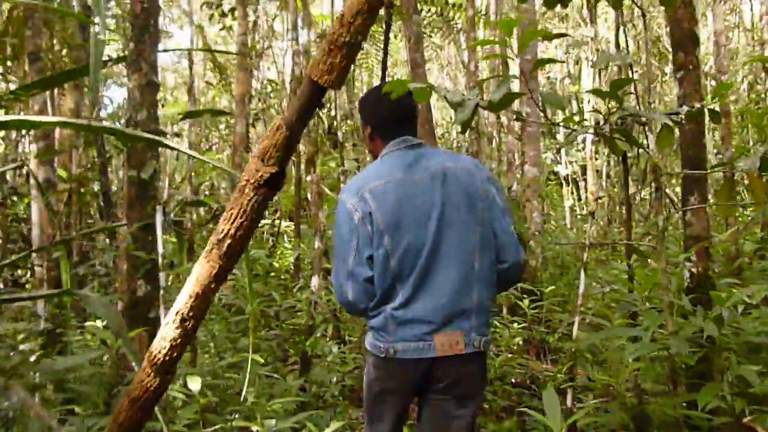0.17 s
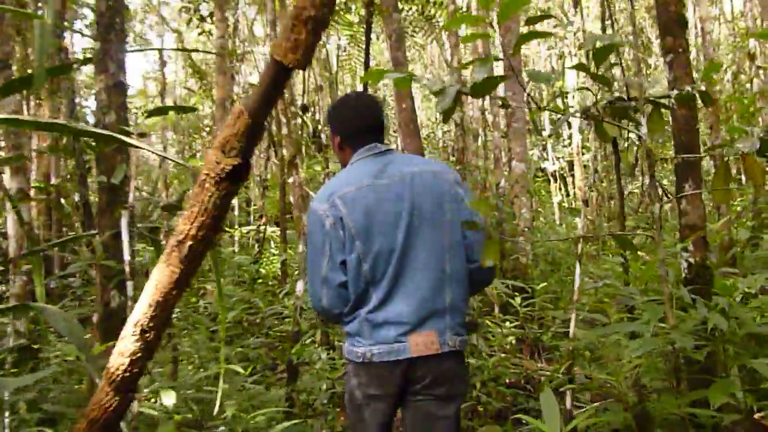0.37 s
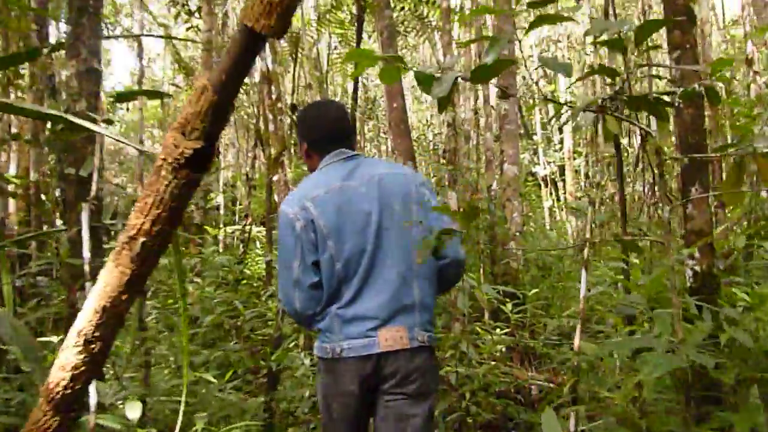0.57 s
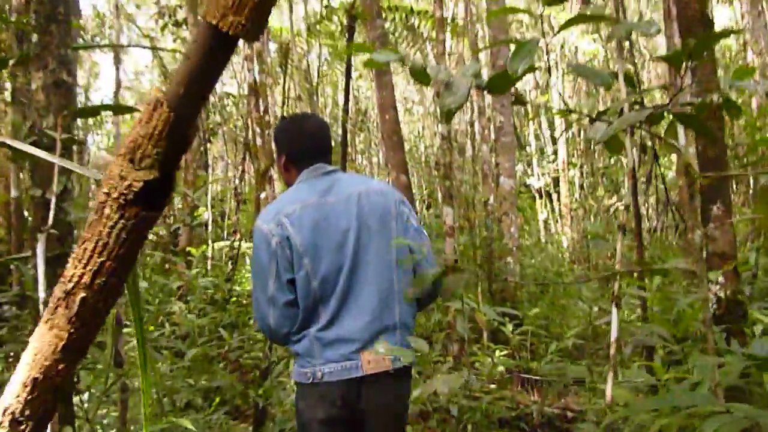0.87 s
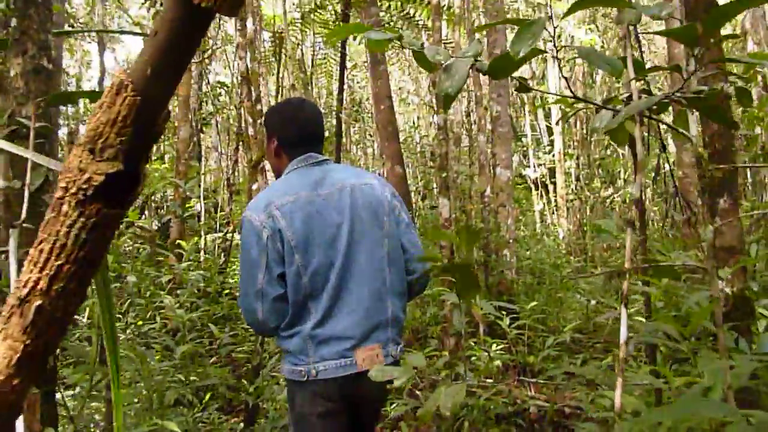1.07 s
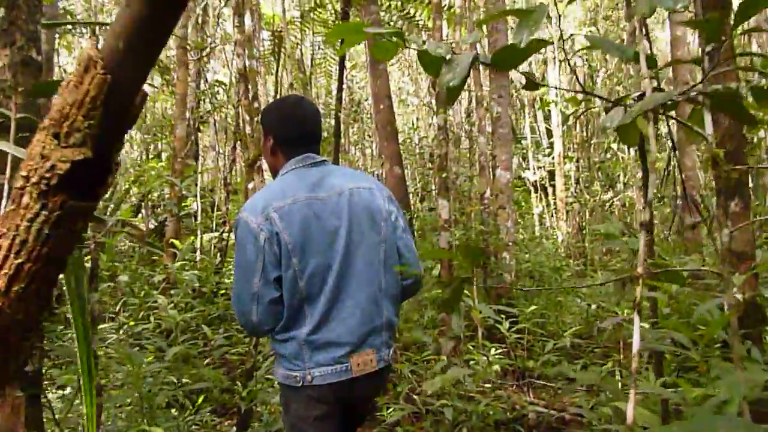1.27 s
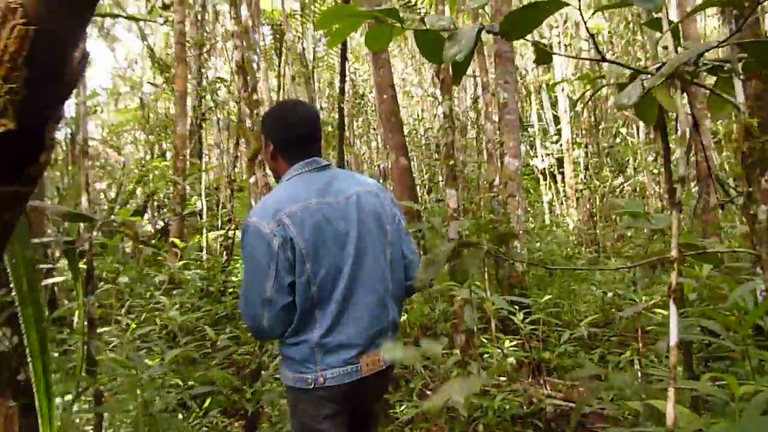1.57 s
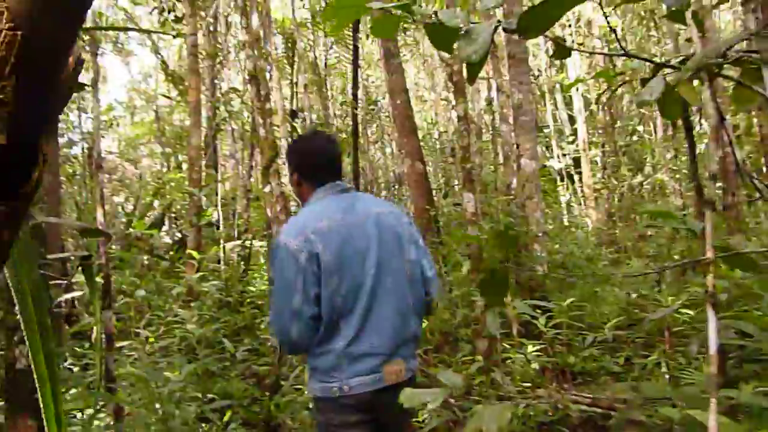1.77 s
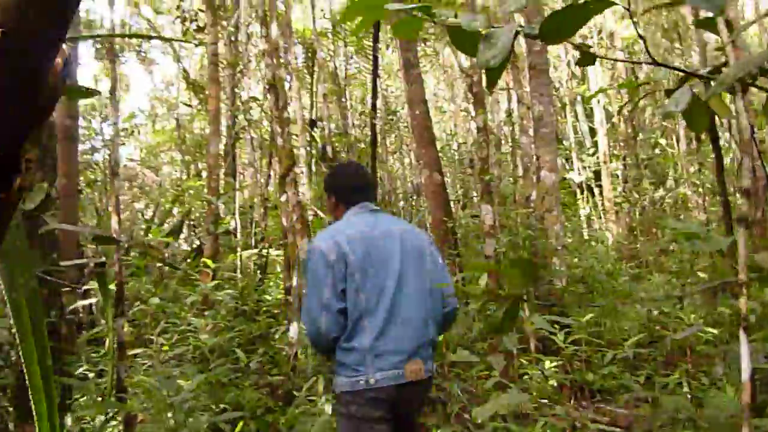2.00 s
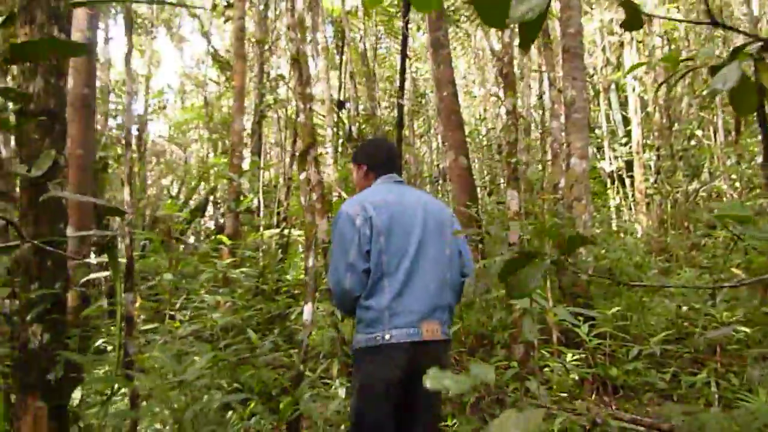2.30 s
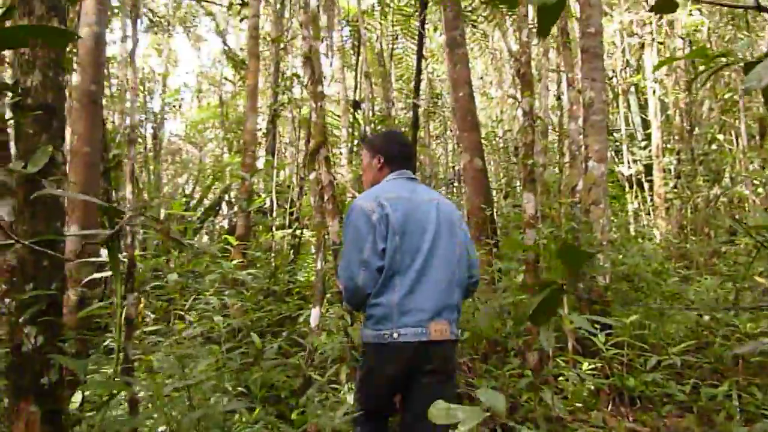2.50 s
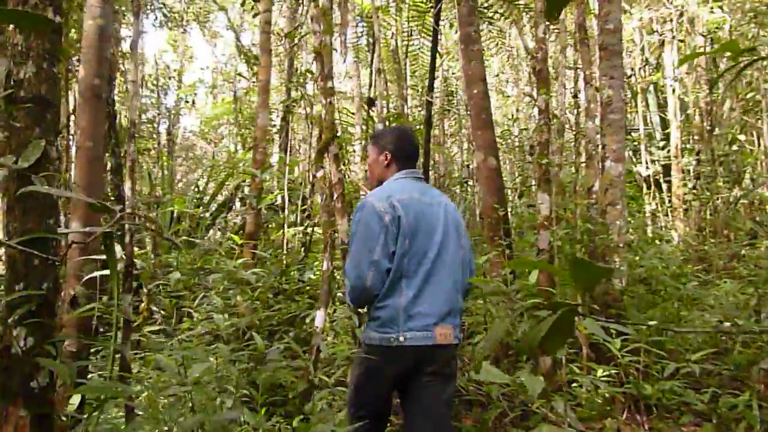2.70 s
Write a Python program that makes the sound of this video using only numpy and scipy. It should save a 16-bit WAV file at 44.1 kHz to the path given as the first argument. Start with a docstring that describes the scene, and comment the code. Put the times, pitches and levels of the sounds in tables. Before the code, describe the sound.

A lemur honks six times in a forest, about every 0.4 seconds from 0.3 to 2.5 seconds, each echoing honk on the same pitch and led by a quieter, hoarse grunt. The first four crack into a rasp; the last two are cleaner. Leaves rustle softly underfoot during the first second, with one tiny high squeak near 0.3 seconds. A faint forest hiss continues throughout.

```python
"""In a rainforest, a lemur honks six times, with a low, hoarse grunt before each honk.
A honk is a stack of harmonics: tones at whole multiples of one pitch. The first four crack into
a rasp and a second, higher voice; the last two stay clean. Tree trunks throw back a long echo.
Leaves rustle underfoot over a faint forest hiss, and there is one short, high squeak."""
import sys
import numpy as np
from scipy import signal
from scipy.fft import rfft, irfft, next_fast_len
from scipy.io import wavfile

SR = 44100
rng = np.random.default_rng(int(sys.argv[2]) if len(sys.argv) > 2 else 0)


def master(y):
    """Save y as 16-bit WAV."""
    cut = np.clip(np.atleast_2d(y).T, -1, 1)
    pcm = np.round(cut * 32767)  # scale
    wavfile.write(sys.argv[1], SR, pcm.astype(np.int16))


N = 125685
TIME = np.arange(N) / SR

# tone colour of the forest hiss: frequency_hz, relative_db
HISS_COLOUR = [(15, -47.5), (25, -29), (50, -11), (120, -2.5), (250, 0.5), (600, -2.5), (1200, -7.5),
               (2500, -16), (4500, -10.5), (6500, -17.5), (9000, -41)]
# steps in the leaves: middle_s, half_length_s, level_db
FOOTSTEPS = [(0.028, .08, -41), (0.238, .09, -44), (0.901, .05, -43.5), (2.71, .03, -95.5)]
# tone colour of the leaves: frequency_hz, relative_db
LEAF_COLOUR = [(100, -17.5), (300, 1.5), (1100, 4), (2600, -5), (4200, -5.5), (6200, -2), (7500, -8),
               (9000, -20)]
# grunts: start_s, length_s, pitch_hz, glide_hz_per_s, level_db, noise_share, tilt_db_per_octave
GRUNT_CALLS = [(0.141, 0.16, 229.3, -280, -31.5, 0.22, 3.5), (0.493, 0.18, 188.1, -38, -35.5, 0.31, 2.5),
               (0.876, .20, 190.9, -18, -34.5, 0.3, 3), (1.261, 0.24, 186.7, 26.5, -36, 0.25, 3.5),
               (1.656, 0.22, 181, -2.5, -41, 0.85, 2), (2.143, 0.15, 198.5, 17.5, -39, .92, 3.5)]
# how the throat colours a grunt: frequency_hz, relative_db
THROAT_COLOUR = [(100, -19.5), (150, -16), (190, 10), (280, 8.5), (450, -3.5), (560, -2.5), (700, 11),
                 (900, -4.5), (1200, 1.5), (1500, -7.5), (2100, -16.5), (3000, -36), (8000, -46.5)]
# single echoes from big trunks: delay_s, level_db
TRUNK_SLAPS = [(.034, -17.5), (.072, -15), (.2, -32)]
# the long echo: frequency_hz, time_to_fade_60_db_s, level_db
ECHO_BANDS = [(150, .45, -16.5), (670, 0.83, -5.5), (1410, 0.86, -6), (2130, 0.96, -3), (3450, 0.73, 0),
              (6500, 0.91, 1)]
# the squeak: middle_s, half_length_s, pitch_hz, width_hz
HIGH_SQUEAK = (.326, .007, 6550, 150)
# honks: start_s, length_s, pitch_hz, level_db, second_harmonic_db, third_harmonic_db, treble_db,
# hoarseness_db, lowest_harmonic_fade_db_per_s, overtone_swell_db_per_s
HONK_CALLS = [(.333, 0.1, 678.2, -11.5, -5, -6, -5.5, -38, 114.5, 3),
              (.662, 0.17, 656.3, -14, -3.5, -4.5, -5.5, -29.5, 40, 12.5),
              (1.064, 0.16, 660.6, -17, -2, -1.5, 0.5, -13.5, 3, 9),
              (1.474, 0.14, 660.7, -19.5, 2, -1.5, 2, -16, 40, -6.5),
              (1.890, 0.1494, 667.1, -16, -8, -2.5, -3.5, -22.5, 55, 31.5),
              (2.310, 0.16, 664.2, -16, 0, -4.5, -6, -35, 42, 23.5)]
# tone colour of the rasp that opens a honk: frequency_hz, relative_db
OPENING_RASP_COLOUR = [(200, -26), (450, -9.5), (620, 1), (900, -6), (1250, -5), (1700, -12.5), (2100, -14),
                       (2700, -36.5), (6000, -34.5)]
# tone colour of the rasp in hoarse or cracking honks: frequency_hz, relative_db
RASP_COLOUR = [(200, -44), (450, -19), (650, 3.5), (850, 0), (1250, 10), (1700, -4), (2100, 6),
               (2600, -25.5), (3500, -21.5), (4700, -14), (6500, -22), (9000, -45)]
# how the voice colours a honk's harmonics: frequency_hz, gain_db
VOICE_COLOUR = [(660, -2), (2050, -8), (2700, -25), (3400, -25), (4000, -30), (4700, -25.5), (6000, -29),
                (6700, -28.5), (7400, -36), (8800, -46)]
# strong-weak pulses add a tone half a step down the stack: harmonic_hz, relative_to_harmonic_db
BETWEEN_TONES = [(330, -39.5), (1650, -35), (3000, -12), (4300, -16.5), (6300, -10.5), (8000, -5)]
# where the higher voice breaks in:
# middle_s, half_length_s, pitch_hz, rasp_db, higher_voice_db, lower_voice_left_db, jitter_share
VOICE_CRACKS = [(.346, 0.0088, 692.6, -17, -2, -8, 0.0024), (.729, 0.0081, 693.8, -22, -2, -7, 0.008),
                (1.112, 0.0043, 688.4, -24.5, -2.5, -7.5, 0.0065),
                (1.521, 0.01, 695.5, -21.5, -1, 1, 0.0094)]
# the microphone's tone colour: frequency_hz, gain_db
MICROPHONE_COLOUR = [(20, 0), (2700, 0), (2880, -10), (3000, -28), (3120, -10), (3300, 0), (4950, 0),
                     (5120, -9), (5205, -28), (5300, -5), (5600, 0), (7350, 0), (7700, -10), (8000, -38),
                     (8300, -14), (8750, -10), (9000, -22)]


def amp(db):
    """Turns decibels into a number to multiply by."""
    return 10 ** (np.asarray(db) / 20)


def unit(x):
    """Scales a signal to an average strength (rms) of 1."""
    return x / np.sqrt(np.mean(x ** 2) + 1e-20)


def read(points, hz, column=1):
    """Reads between a table's rows, with octaves evenly spaced."""
    table = np.transpose(points)
    return np.interp(np.log(hz + 1), np.log(table[0]), table[column])


def colour(x, points):
    """Turns each frequency up or down as a table says."""
    size = next_fast_len(2 * len(x))
    return irfft(rfft(x, size) * amp(read(points, np.fft.rfftfreq(size, 1 / SR))), size)[:len(x)]


def noise(points):
    """Noise of strength 1 with the given tone colour."""
    return unit(colour(rng.standard_normal(N), points))


def wander(hz):
    """A random wobble of strength 1, up to about the given rate."""
    keep_slow = np.exp(-(np.fft.rfftfreq(N, 1 / SR) / hz) ** 2)
    return unit(irfft(rfft(rng.standard_normal(N)) * keep_slow, N))


def bump(at, half):
    """A bell-shaped rise and fall in time."""
    return np.exp(-.5 * ((TIME - at) / half) ** 2)


def gate(t, length, rise_s, fall_s):
    """Fades in, holds and fades out."""
    return np.sin(np.pi / 2 * np.clip(t / rise_s, 0, 1) * np.clip((length - t) / fall_s + .5, 0, 1)) ** 2


def forest_hiss():
    """A faint hiss whose level wavers a little."""
    return amp(-52.5) * noise(HISS_COLOUR) * amp(1.5 * wander(hz=5))


def leaf_steps():
    """Leaves crackle underfoot in short bursts of flickering noise."""
    crackle = unit(noise(LEAF_COLOUR) * amp(1.86 * wander(hz=150)))
    return crackle * sum(amp(db) * bump(at, half) for at, half, db in FOOTSTEPS)


def grunts(rise_s=.038, fall_s=.069, jitter=.015, between_db=-5):
    """Low pulses, strong and weak in turn, pass with hoarse noise through the lemur's throat."""
    out, shake = np.zeros(N), wander(hz=50)
    for start, length, pitch, glide, db, noise_share, tilt_db in GRUNT_CALLS:
        on = (TIME >= start) & (TIME < start + length + fall_s)
        t = TIME[on] - start
        hoarse = noise([(hz, level + tilt_db * np.log2(hz / pitch)) for hz, level in THROAT_COLOUR])
        phase = 2 * np.pi * np.cumsum((pitch + glide * t) * (1 + jitter * shake[on])) / SR
        pulses = 0
        for k in range(2, 20):  # even k: harmonics; odd k: the tones between them
            tone_db = read(THROAT_COLOUR, k * pitch / 2) + between_db * (k % 2) + tilt_db * np.log2(k)
            pulses += amp(tone_db) * np.cos(k * phase / 2 + rng.uniform(0, 2 * np.pi))
        grunt = np.sqrt(1 - noise_share) * unit(pulses) + np.sqrt(noise_share) * hoarse[on]
        out[on] += amp(db) * gate(t, length, rise_s, fall_s) * grunt
    return out


def trunk_echo(calls, echoes_per_s=2500, build_s=.005, hold_s=.12):
    """Trunks throw the calls back: three single slaps, and many small echoes that blur and die away."""
    size = 2 * SR
    scatter = rng.standard_normal(size) * (rng.random(size) < echoes_per_s / SR)
    hz, t, bands = signal.stft(unit(scatter), SR, nperseg=256)
    fade = amp(-60 * np.maximum(t - hold_s, 0) / read(ECHO_BANDS, hz)[:, None])
    shape = fade * (1 - np.exp(-t / build_s))
    shape /= np.sqrt(np.mean(shape ** 2, axis=1, keepdims=True) * size)  # same energy in each band
    band_gain = amp(read(ECHO_BANDS, hz, column=2))[:, None]
    tail = signal.istft(bands * shape * band_gain, SR, nperseg=256)[1]
    slaps = sum(amp(db) * np.interp(TIME - delay, TIME, calls, left=0) for delay, db in TRUNK_SLAPS)
    return calls + slaps + signal.fftconvolve(calls, tail)[:N]


def squeak():
    """One very short, high, fluttering tone."""
    at, half, hz, width = HIGH_SQUEAK
    return amp(-35.5) * bump(at, half) * unit(wander(width) * np.sin(2 * np.pi * hz * TIME))


def honk_voice(t, length, hz, harmonic_db, fade_db, swell_db, open_s=.003, close_s=.012):
    """A stack of harmonics: high ones open and close more slowly, and the lowest fades as it sounds."""
    phase, out = 2 * np.pi * np.cumsum(hz) / SR, 0
    for k, db in enumerate(harmonic_db, 1):
        harmonic_hz = k * np.median(hz)
        opening = (1 - np.exp(-t / (open_s * k))) ** 2
        closing = .5 + .5 * np.tanh((length - t) / (close_s * k) + 1)
        harmonic = np.cos(k * phase + rng.uniform(0, 2 * np.pi))
        between = amp(read(BETWEEN_TONES, harmonic_hz)) * np.cos((k - .5) * phase)
        level_db = read(VOICE_COLOUR, harmonic_hz) + db + t * (-fade_db if k == 1 else swell_db)
        out += opening * closing * amp(level_db) * (harmonic + between)
    return np.sqrt(2) * out


def honks(rise_s=.022, fall_s=.085, jitter=.0021, sag_hz_per_s=20.8, high_sag_hz_per_s=110):
    """Each honk slides up out of a rasp to a held pitch; a crack lets in a shakier, higher voice."""
    out, rasp, opening_rasp = np.zeros(N), noise(RASP_COLOUR), noise(OPENING_RASP_COLOUR)
    shake = wander(hz=130)
    for i, honk in enumerate(HONK_CALLS):
        start, length, pitch, db, second_db, third_db, treble_db, hoarse_db, fade_db, swell_db = honk
        on = (TIME >= start) & (TIME < start + length + fall_s)
        t = TIME[on] - start
        scoop = .25 * np.exp(-t / .007)  # the pitch starts 25% low
        end_drop = .006 * np.exp(np.minimum((t - length) / .015, 1))
        bend = 1 - scoop - end_drop
        hz = (pitch - sag_hz_per_s * t) * (bend + jitter * shake[on])
        harmonic_db = [0, second_db, third_db] + [treble_db] * 10
        tone = honk_voice(t, length, hz, harmonic_db, fade_db, swell_db)
        if i < len(VOICE_CRACKS):
            at, half, high_pitch, rasp_db, high_db, left_db, high_jitter = VOICE_CRACKS[i]
            since = TIME[on] - at
            cracked = .5 + .5 * np.tanh(since / half)  # 0 before the crack, 1 after
            high_hz = (high_pitch - high_sag_hz_per_s * since) * (bend + high_jitter * shake[on])
            high = honk_voice(t, length, high_hz, harmonic_db, fade_db, swell_db)
            tone = (1 - cracked) * tone + cracked * (amp(left_db) * tone + amp(high_db) * high)
            tone *= 1 - .28 * bump(at, half)[on]  # the level dips briefly
            out += amp(rasp_db) * bump(at, half) * rasp
        out[on] += amp(db) * gate(t, length, rise_s, fall_s) * (tone + amp(hoarse_db) * rasp[on])
        out += amp(-34) * bump(start + .0051, half=.018) * opening_rasp
    return out


def scene():
    """The lemur among the trees, with the small forest sounds close by."""
    return (trunk_echo(honks() + grunts()) + leaf_steps() + squeak() + forest_hiss())[None]


def record(dry):
    """A small microphone cuts three deep notches in the treble; sound above 9000 Hz is filtered out."""
    coloured = colour(dry[0], MICROPHONE_COLOUR)
    low_pass = signal.firwin(511, 9000, window=("kaiser", 9), fs=SR)
    return signal.oaconvolve(coloured, low_pass, "same")[None]


dry = scene()
out = record(dry)
master(out)
```